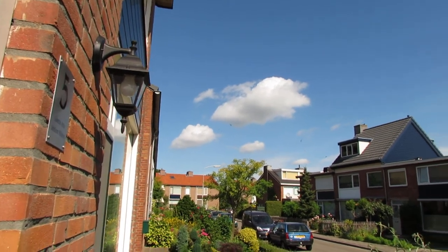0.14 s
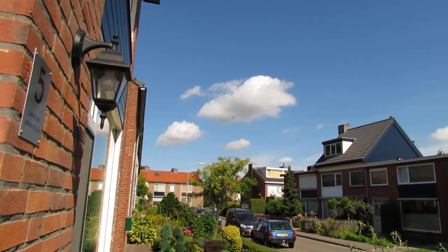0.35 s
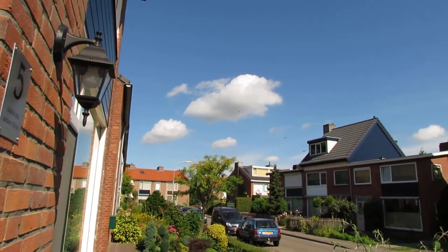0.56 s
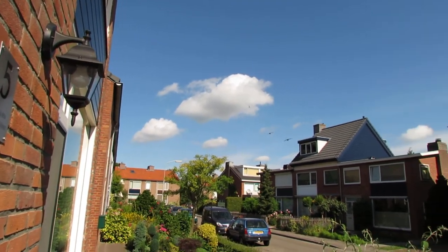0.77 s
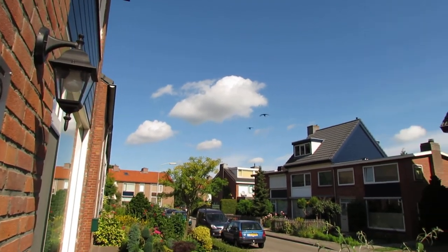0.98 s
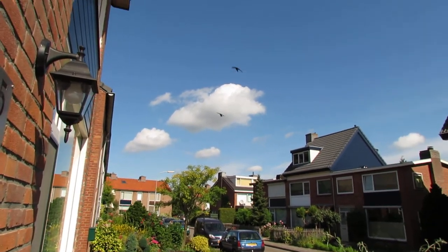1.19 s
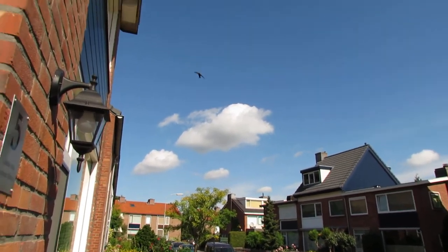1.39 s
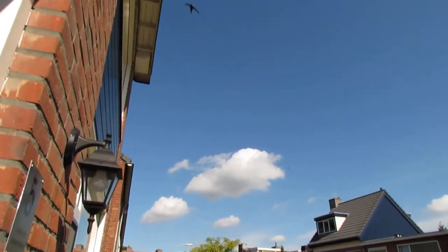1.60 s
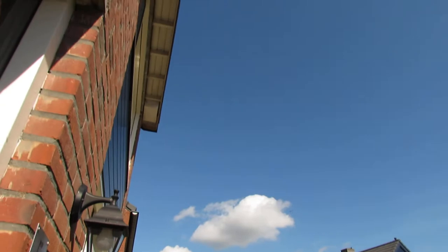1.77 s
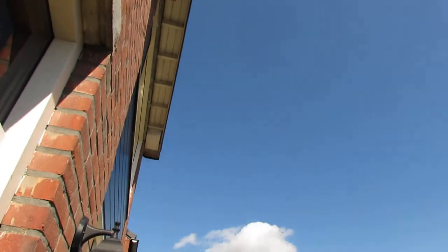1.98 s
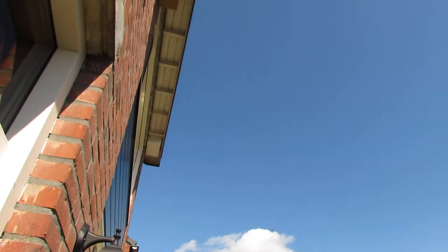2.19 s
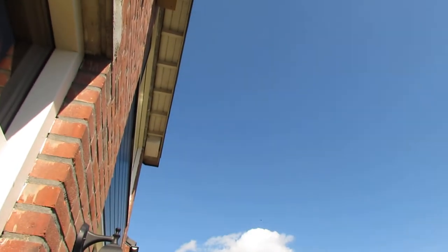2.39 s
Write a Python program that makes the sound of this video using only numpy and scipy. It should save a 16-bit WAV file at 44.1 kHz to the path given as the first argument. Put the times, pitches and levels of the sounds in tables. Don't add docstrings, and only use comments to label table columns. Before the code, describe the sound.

Shrill, buzzing swift calls rise, shake and break into rapid trills, each nearer than the last, caught by a handheld stereo microphone in a street; they stop abruptly, leaving soft rumble and tiny far sounds.

```python
import sys
import numpy as np
from scipy import signal
from scipy.io import wavfile
from scipy.ndimage import uniform_filter1d

SR = 44100
rng = np.random.default_rng(int(sys.argv[2]) if len(sys.argv) > 2 else 0)


def dump(signal):
    limited = np.clip(np.atleast_2d(signal).T, -1, 1)
    pcm = np.round(limited * 32767).astype(np.int16)
    wavfile.write(sys.argv[1], SR, pcm)


def boost(x):
    u = np.asarray(x, float) / 20
    return 10 ** u


N = 108045
T = np.arange(N) / SR
EAR = np.array([[.5], [-.5]])


def rms_one(x):
    return x / np.sqrt(np.mean(x ** 2) + 1e-20)


def at_hz(points, hz):
    point_hz, value = np.transpose(points)
    return np.interp(np.log(hz), np.log(point_hz), value)


def drift(rate):
    r = np.exp(-2 * np.pi * rate / SR)
    return rms_one(signal.lfilter([1], [1, -2 * r, r * r], rng.standard_normal(N + SR))[SR:])


def smooth(x, seconds):
    width = int(seconds * SR) + 1
    return uniform_filter1d(uniform_filter1d(x, width), width)


def band(x, low, high, order=2):
    return signal.sosfilt(signal.butter(order, [low, high], "band", fs=SR, output="sos"), x)


def whistle_phase(hz):
    return 2 * np.pi * np.cumsum(hz) / SR


def town():
    # frequency in Hz, density in dB per Hz.
    rumble = [(15, -54), (40, -6.5), (123, -4.5), (270, -16.5), (394, -8.5), (439, -20), (863, -18.5),
              (2760, -27.5), (16000, -46)]
    # frequency in Hz, left-right likeness from 0 to 1.
    likeness = [(30, 0.26), (70, 0.99), (150, 0.097), (400, 0.029), (16000, 0.056)]
    # time in seconds, level in dB.
    engine_level = [(0, -41.5), (.3, -53.5), (.6, -43), (1.3, -44.5), (1.45, -49.5), (2.45, -64)]
    rumble_db, engine_hz = -44.5, 63.5
    out = 0
    edges = 31 * 2 ** np.arange(0, 9.1, .5)
    white = rng.standard_normal((2, 2, N + SR))
    for k, (low, high) in enumerate(zip(edges, edges[1:])):
        centre = np.sqrt(low * high)
        mid, side = band(white[k % 2], low, high)[:, SR:]
        alike = np.clip(at_hz(likeness, centre), 0, 1)
        both = np.sqrt(1 + alike) * mid + np.sqrt(1 - alike) * side * [[1], [-1]]
        out = out + boost(at_hz(rumble, centre) + 0.85 * drift(3.3)) * both
    engine_db = np.interp(T, *np.transpose(engine_level)) + 3.5
    engine = np.sin(whistle_phase(engine_hz + 1.06 * drift(2.4))) * boost(engine_db)
    return boost(rumble_db) * rms_one(out) + engine


def knock():
    # frequency in Hz, level in dB, t60 in seconds.
    rings = [
        (591.4, 12, 0.2),
        (1255, 2.5, 0.088),
    ]
    start_s, level_db, rise_s = 1.795, -46, 0.0055
    t = np.maximum(T - start_s, 0)
    out = 0
    for hz, db, t60 in rings:
        ring = np.sin(2 * np.pi * hz * t) * drift(161)
        out = out + boost(level_db + db - 60 * t / t60) * ring * np.minimum(t / rise_s, 1)
    return out


def ticks():
    # start in seconds, centre in Hz, level in dB, t60 in seconds.
    puffs = [
        (2.087, 9270, -49.5, 0.033),
        (2.115, 6000, -54, 0.013),
        (2.118, 2400, -49, 0.0088),
    ]
    out = 0
    for s, hz, db, t60 in puffs:
        puff = band(rng.standard_normal(N), hz / 1.5, hz * 1.24)
        out = out + boost(db - 60 * np.abs(T - s) / t60) * (T > s) * puff
    return out


def jackdaw():
    # time in seconds, pitch in Hz, level in dB.
    yelp_path = [
        (2.146, 1420, -50),
        (2.152, 1370, -41),
        (2.168, 1170, -42),
        (2.182, 960, -43),
        (2.21, 770, -52),
    ]
    harmonics_db = (-9, 0, -11, -8, -17)
    dulling_db_per_s, echo_s, echo_db = 420, 0.033, -2.5
    s, hz, db = np.transpose(yelp_path)
    phase = whistle_phase(np.interp(T, s, hz))
    dull_db = dulling_db_per_s * np.abs(T - s[0])
    voice = 0
    for k, part_db in enumerate(harmonics_db):
        voice = voice + boost(part_db - dull_db * (k > 1)) * np.sin((k + 1) * phase)
    yelp = boost(np.interp(T, s, db, -120, -120)) * voice
    return yelp + boost(echo_db) * np.interp(T - echo_s, T, smooth(yelp, .00009))


def squeaks():
    # start in seconds, first pitch in Hz, last pitch in Hz, level in dB, length in seconds.
    glides = [(0.831, 8100, 7900, -37.5, .012), (0.68, 8300, 7800, -34.5, 0.01),
              (.894, 8100, 7430, -36, 0.011), (1.456, 7200, 7700, -21.5, 0.012),
              (1.49, 7620, 7600, -28, 0.022), (1.522, 7700, 7520, -30, 0.0053),
              (1.5597, 14000, 4950, -33, 0.0014), (1.594, 4500, 3170, -33.5, 0.013),
              (1.594, 8200, 8200, -36.5, 0.0073), (1.677, 4300, 5800, -51, 0.0145),
              (1.5595, 13000, 7000, -35, 0.0021), (1.3, 4550, 6100, -39.5, .05),
              (1.6, 3800, 5200, -45, .04), (.173, 10000, 12000, -36.5, 0.0063),
              (1.364, 4800, 3300, -36.5, 0.0033), (0.425, 2300, 1700, -48.5, 0.044),
              (-.01, 1335, 1403, -53.5, 0.17)]
    out = 0
    for s, from_hz, to_hz, db, length in glides:
        place = np.clip((T - s) / length, 0, 1)
        swell = np.sin(np.pi * np.sqrt(place))
        out = out + boost(db) * swell * np.sin(whistle_phase(from_hz + (to_hz - from_hz) * place))
    return out * (1 + 0.99 * drift(350))


def trill(number):
    # scream number, first note in seconds, first gap in seconds, gap growth per note,
    # note length in seconds.
    closing = [
        (0, .24, .014, 1.01, 0.011),
        (2, .8197, .03, 1.055, .007),
        (3, .621, 0.0113, 1.025, 0.00623),
        (4, 1.4498, .03, 1.05, .0065),
        (5, 1.3405, 0.014, 1.022, 0.0053),
    ]
    between_db, snap_s, rise_s = -24, 0.0013, 0.0006
    for which, first, gap, growth, length in closing:
        if round(which) == number:
            starts = first + gap * np.cumsum(np.r_[0, growth ** np.arange(16)])
            since = T - starts[np.clip(np.searchsorted(starts, T) - 1, 0, None)]
            note = np.clip(since / rise_s, 0, 1) * np.clip(3.2 * (1 - since / length), 0, 1)
            before = smooth(1. * (T < first - .4 * gap), 0.0041)
            gate = np.maximum(np.maximum(note, boost(between_db)), before)
            place = (np.clip(since / length, 0, 1) - .5) * (T > first)
            snap = np.exp(-np.abs(since) / snap_s) * (since > 0)
            return gate, place, snap
    return 1, 0, 0


def scream(number, rows, buzz_hz, octave_db, breath_db):
    half_partials_db = (-14.5, -2.5, -11.5)
    third_db = (-50, -34, -51, -36, -19.5, -42)
    octave_fade_db = (5.4, 9.6, 0.55, 5, 6.8, 1.1)
    pitch_jitter_hz = (55, 60, 12, 14, 14, 12)
    note_drop_hz = (206, 10, -60, 198.5, 31, 130.5)
    bend_s, buzz_swing_hz, buzz_jitter, level_jitter_db = .008, 216, .03, 1.6
    rasp_db, half_pulse, half_rasp, third_s = -26, 0.73, 0.36, 0.028
    octave_pan_db, ear_wander_db, ear_lag_s = -3, 3.5, 1.25e-5
    overtone_swirl = 0.38
    snap_db, breath_rise_db = -25, 7

    s, *cols = np.transpose(rows)
    hz, db, half_db, buzz = [smooth(np.interp(T, s, c), 0.0056) for c in cols]
    gate, place, snap = trill(number)
    along = np.clip((T - s[0]) / (s[-1] - s[0]), 0, 1)

    buzz = np.clip(buzz, 0, 1)
    cycle = whistle_phase(buzz_hz * (1 + buzz_jitter * drift(14.44)))
    pulse = 1 + .5 * buzz * np.cos(cycle + 0.29)
    hz = smooth(hz, bend_s) + buzz_swing_hz * buzz * np.sin(cycle)
    hz = hz + pitch_jitter_hz[number] * drift(70.2) - note_drop_hz[number] * place
    lag_cycles = EAR * hz * ear_lag_s * (1 + 0.32 * drift(7.2))
    phase = whistle_phase(hz) + 2 * np.pi * lag_cycles
    swirl = 2 * EAR * overtone_swirl * drift(58)

    tone = np.sin(phase) * (pulse + boost(rasp_db) * drift(1000)) * boost(EAR * ear_wander_db * drift(16.3))
    octave_db = octave_db - octave_fade_db[number] * along + 2.0 * drift(34)
    octave_db = octave_db + EAR * (octave_pan_db + 3.2 * drift(31))
    tone = tone + boost(octave_db) * np.sin(2 * phase + swirl)
    deep_pulse = (1 + half_pulse * np.sqrt(buzz) * np.cos(cycle + 0.3)) ** 2
    for k, part_db in enumerate(half_partials_db):
        level = boost(half_db + part_db + 1.3 * drift(82) + EAR * octave_pan_db)
        tone = tone + level * np.sin((k + .5) * phase + swirl) * (deep_pulse + half_rasp * drift(490))
    tone = tone + boost(third_db[number]) * np.exp(-np.abs(T - s[0]) / third_s) * np.sin(3 * phase)

    air = rng.standard_normal((3, N))
    breath = band(air[:2] + 0.87 * air[2], 6870, 12360, 5)
    breath = breath * (boost(breath_db + breath_rise_db * (along - 0.5)) * pulse + boost(snap_db) * snap)
    alive = smooth(1. * (T > s[0]) * (T < s[-1]), 0.0017)
    return np.sqrt(2) * boost(db + level_jitter_db * drift(45.0)) * gate * alive * (tone + breath)


def street(x):
    gap_s, near_t60_s, far_t60_s, far_db, cut_hz = 0.0074, 0.38, 0.9, -11.5, 6630
    t = np.arange(SR) / SR - gap_s
    decay = boost(-60 * t / near_t60_s) + boost(far_db - 60 * t / far_t60_s)
    tail = rng.standard_normal((2, SR)) * decay * (t > 0)
    tail = tail + 4.3 * signal.sosfilt(signal.butter(4, cut_hz, fs=SR, output="sos"), tail)
    return signal.fftconvolve(x[None], rms_one(tail) / np.sqrt(SR), axes=1)[:, :N]


def house_fronts(direct):
    out = 0
    for lag_s, db in ((0.0010964, -18), (0.018, -9.5)):
        left = np.interp(T - lag_s, T, direct[0])
        right = np.interp(T - lag_s * 1.08, T, direct[1])
        out = out + boost(db) * np.array([left, right])
    return out


def scene():
    # time in seconds, pitch in Hz, level in dB, half-pitch partials in dB,
    # buzz depth from 0 to 1.
    far_scream = [(-.03, 4550, -44, -22, 0.95), (.06, 5360, -37.5, -22, 0.82), (.16, 5565, -45.5, -33, 1),
                  (.283, 5360, -38, -36, 0.17), (.303, 3630, -44, -39.5, 0.28)]
    wavy_scream = [(.166, 4705, -44, -24.5, 0.12), (0.175, 5350, -31, -42.5, 0.3),
                   (.218, 6300, -21.5, -20.5, 0.21), (0.271, 5718, -27.5, -42, 0.26),
                   (0.308, 5560, -29, -32, 0.32), (0.361, 5910, -26.5, -42.5, 1),
                   (0.409, 6280, -22.5, -33, 1), (0.498, 6002, -28.5, -29, 1),
                   (0.602, 5855, -32, -32.5, 0.96)]
    middle_scream = [(.635, 5575, -26.5, -26.5, 0.55), (.665, 5900, -23.5, -23, 0.81),
                     (0.702, 6030, -23, -30, 0.74), (0.802, 5978, -21, -32, 0.8),
                     (.85, 6103, -18, -27, 0.22), (.885, 5765, -20, -19.5, 0.23),
                     (0.926, 5200, -27.5, -22, 0.21)]
    middle_answer = [(.588, 4292, -43, -21.5, .05), (.61, 5153, -30.5, -25, .05),
                     (.624, 5610, -18, -19.5, .06), (.65, 5793, -23, -29, .1),
                     (0.709, 5753, -21.5, -27.5, .1), (0.749, 5394, -18.5, -21, 0.11),
                     (0.788, 4360, -41, -36, 0.101)]
    near_scream = [(1.03, 4500, -41.5, -2, 0.041), (1.056, 5255, -19.5, -22.5, 0.32),
                   (1.105, 6100, -13, -10, 0.65), (1.163, 6318, -15.5, -15, 0.81),
                   (1.177, 6247, -15.5, -34, 0.93), (1.268, 6154, -12.5, -29.5, 1),
                   (1.42, 6015, -20.5, -23.5, 0.46), (1.501, 5853, -11, -19, 0.47),
                   (1.553, 5303, -12.5, -53, 0.37)]
    near_answer = [(1.232, 4280, -36.5, -29, .05), (1.25, 5260, -20, -16, .05),
                   (1.309, 5820, -23, -27.5, 0.051), (1.348, 5757, -11, -12, 0.043),
                   (1.37, 5780, -5.5, -24, .05), (1.41, 5670, -12, -15.5, .05),
                   (1.45, 5428, -13.5, -29, 0.043), (1.505, 4345, -28, -8, 0.054)]
    # buzz rate in Hz, octave in dB, left-right in dB,
    # street tail in dB, breath in dB, left-right at the end in dB.
    voicing = [
        (267, -15.5, 2.5, -2, -22, 0.5),
        (280, -14, 0, -1.5, -24, 2.5),
        (278, -14.5, 3.5, -2, -32, 2.7),
        (272, -13, 2, -5.5, -37, 1.2),
        (247, -11.5, 1.6, -11, -22.5, 1.5),
        (263, -11, 3, -8, -31.5, 3.5),
    ]
    calls = (far_scream, wavy_scream, middle_scream, middle_answer, near_scream, near_answer)
    far = jackdaw() + knock() + ticks()
    squeak = squeaks()
    direct = squeak * np.ones((2, 1))
    wet = boost(-8.5) * far + boost(-10.0) * squeak
    for k, (rows, voice) in enumerate(zip(calls, voicing)):
        buzz_hz, octave_db, pan_db, tail_db, breath_db, last_pan_db = voice
        call = scream(k, rows, buzz_hz, octave_db, breath_db)
        pan = np.interp(T, [rows[0][0], rows[-1][0]], [pan_db, last_pan_db])
        direct = direct + call * boost(EAR * pan)
        wet = wet + boost(tail_db) * call.mean(0)
    return direct + house_fronts(direct) + street(wet) + far + town()


def roll_off(x):
    return signal.sosfilt(signal.butter(12, 16270, fs=SR, output="sos"), x)


def record(dry):
    duck_from_db, attack_s, release_db_per_s = -19.5, 0.37, 35
    db = 10 * np.log10(smooth(np.mean(dry ** 2, 0), 0.01) + 1e-12)
    release = release_db_per_s * T
    held = np.maximum.accumulate(db + release) - release
    r = np.exp(-1 / (attack_s * SR))
    cut_db = signal.lfilter([1 - r], [1, -r], np.maximum(held - duck_from_db, 0))
    limited = np.tanh(dry * boost(-cut_db))
    mix = signal.sosfilt(signal.cheby2(10, 60, 16300, fs=SR, output="sos"), limited)
    return roll_off(mix)


dry = scene()
out = record(dry)
dump(out)
```